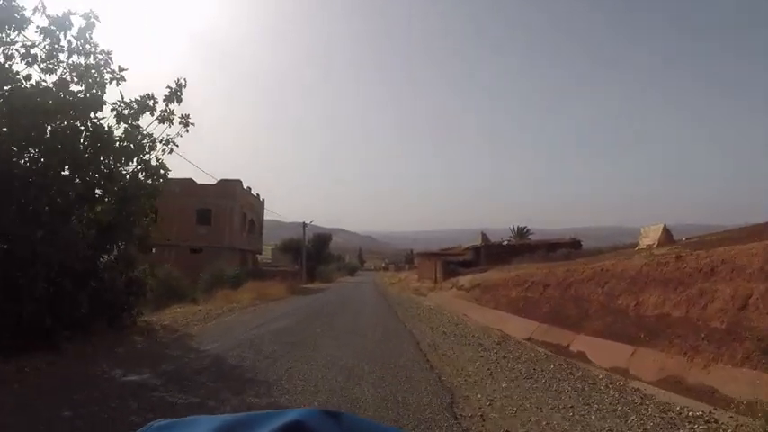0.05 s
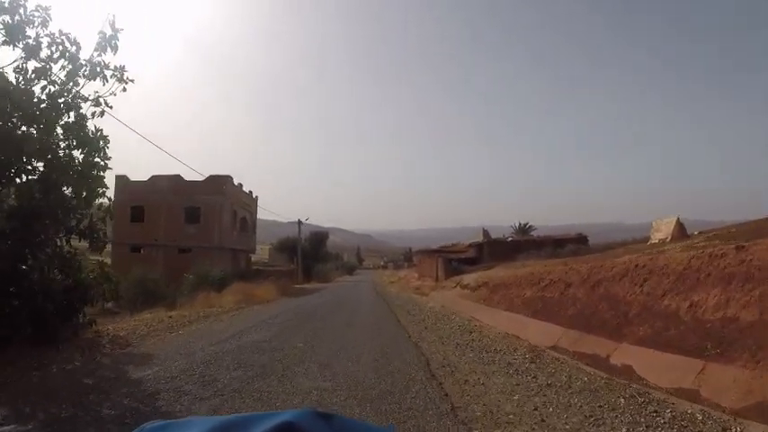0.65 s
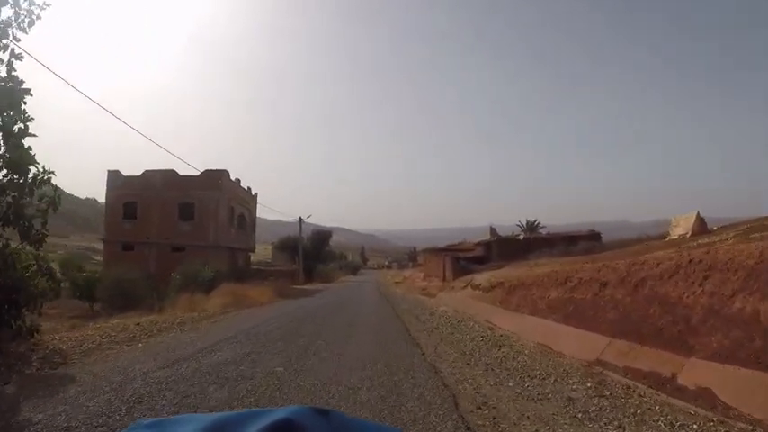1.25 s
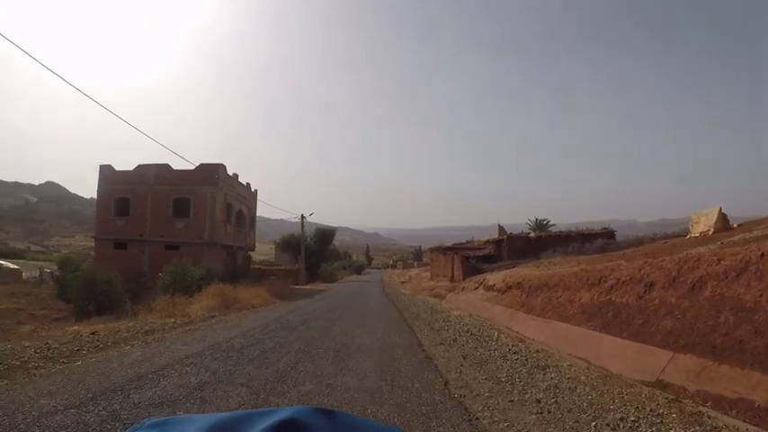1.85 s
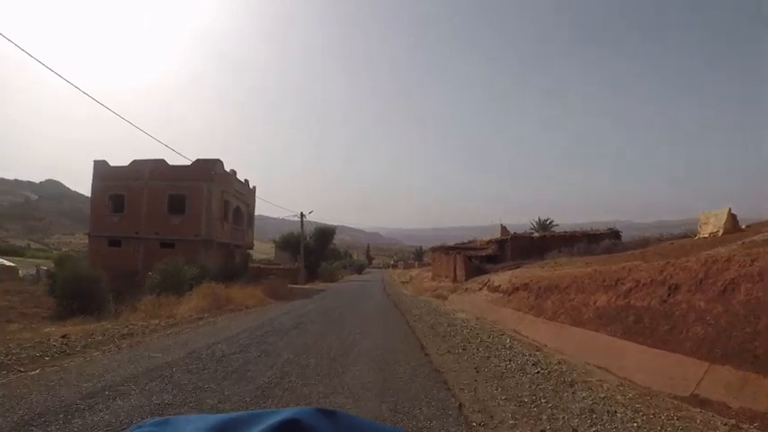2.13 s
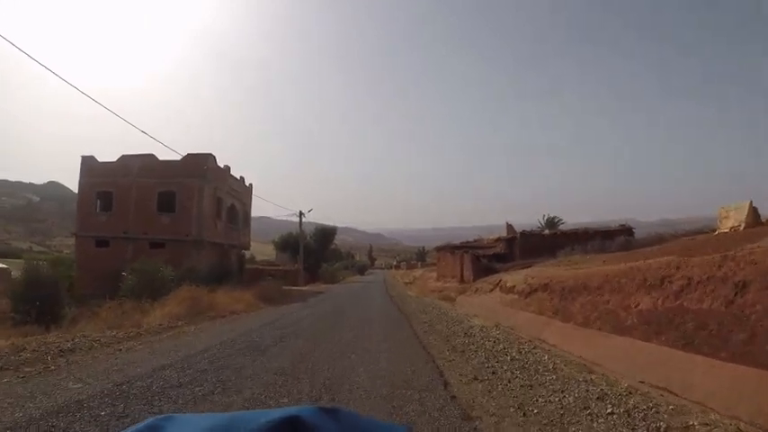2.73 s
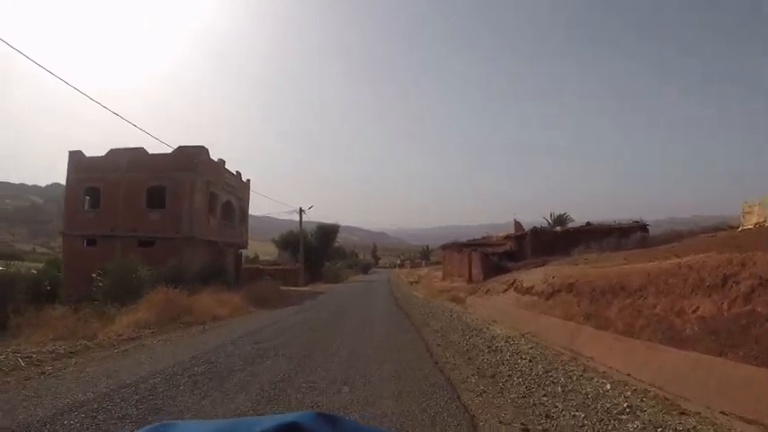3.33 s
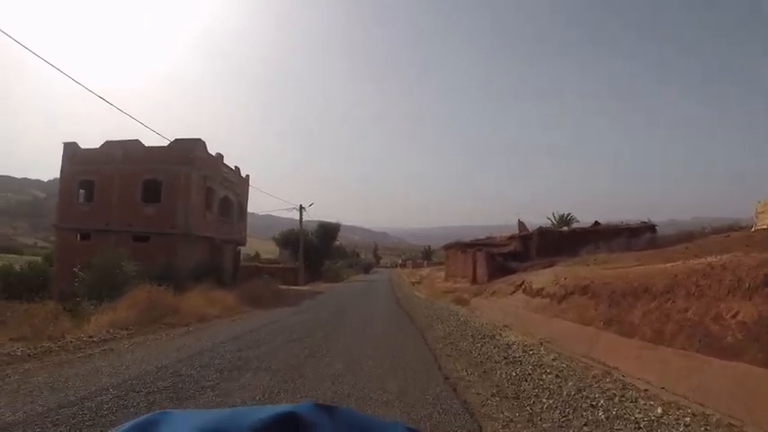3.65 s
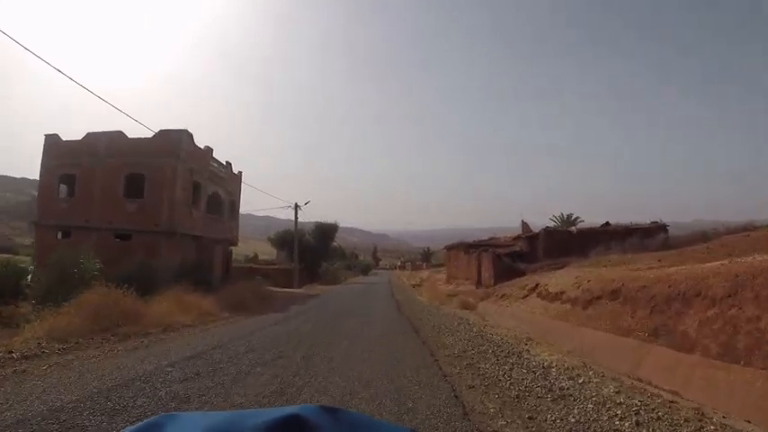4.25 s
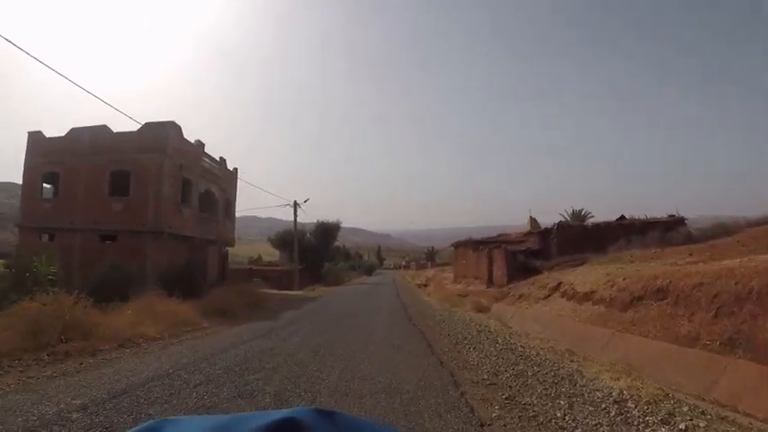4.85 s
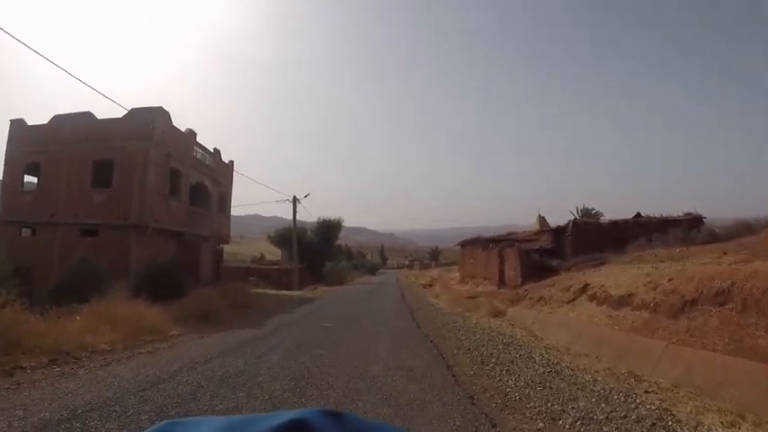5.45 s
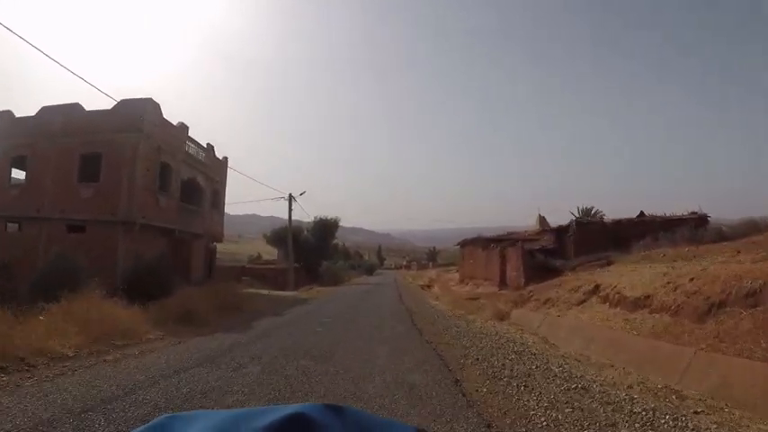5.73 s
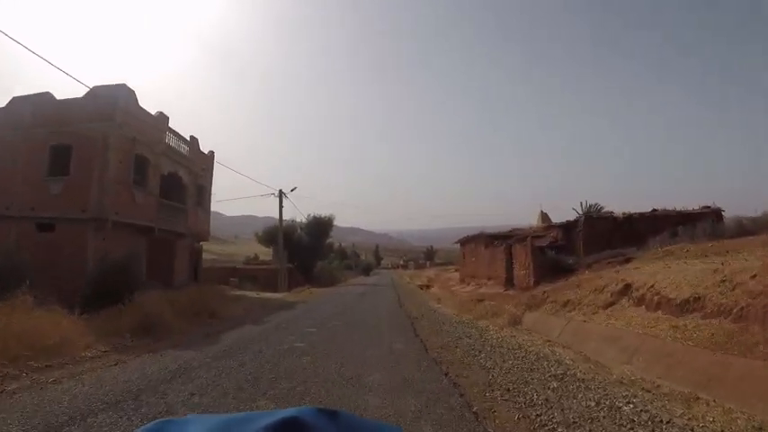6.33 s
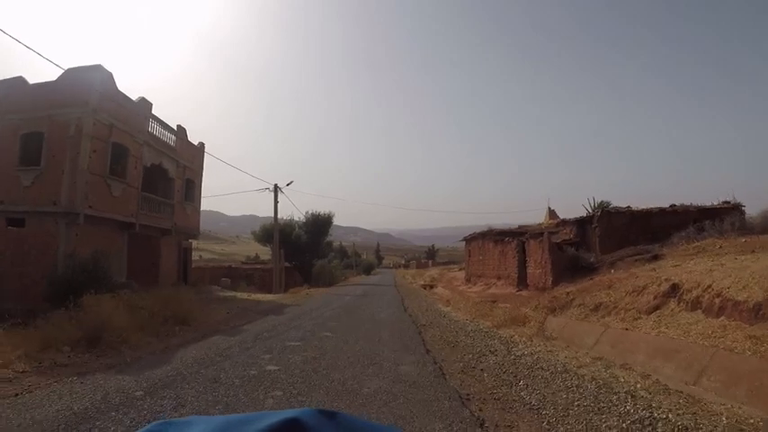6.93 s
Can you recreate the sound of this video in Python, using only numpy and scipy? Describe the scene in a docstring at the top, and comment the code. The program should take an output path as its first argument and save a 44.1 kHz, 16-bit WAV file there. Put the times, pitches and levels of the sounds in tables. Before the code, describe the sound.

Low, gusty wind flutters against a microphone mounted on a loaded cart travelling outdoors. Under it the wheels rumble steadily over coarse asphalt, and bumps keep setting off hollow knocks, dull thumps and short scuffs from the load. Small clicks and light rattles are scattered all the way through, with a couple of sharper ticks a little past the middle.

```python
"""Knocks and thumps over a low, uneven drone: a loaded cart rolls along rough asphalt.
Each bump is an impact that rings the modes of a camera mount on the frame and makes the load scuff
by sliding friction; loose parts tick, rattle and chink, and the load creaks once by stick-slip.
Something brushes about once a turn. Turbulent wind buffets the microphone, over a fine hiss
and a thin shrill band that fades away."""
import sys
import numpy as np
from scipy import signal
from scipy.fft import rfft, irfft, next_fast_len
from scipy.io import wavfile
from scipy.ndimage import uniform_filter1d

SR = 44100
rng = np.random.default_rng(int(sys.argv[2]) if len(sys.argv) > 2 else 0)


def waveform_to_disk(signal):
    """Save audio, clipped to [-1, 1], as 16-bit WAV at the path in sys.argv[1]."""
    frames = np.transpose(np.atleast_2d(signal))
    scaled = np.clip(frames, -1, 1) * 32767
    samples = np.round(scaled).astype(np.int16)
    wavfile.write(sys.argv[1], SR, samples)


N = 312228
T = np.arange(N) / SR

# bumps in the road: (time [s], level [dB], scuff offset [dB], thump offset [dB], rise time [s],
# pitch of the knock [Hz])
BUMPS = [(0.005, -19, -16.5, -22, 0.0037, 412), (0.072, -22.5, -27, -20, 0.0084, 390),
         (0.157, -18, -19, 1, 0.0087, 440), (0.245, -19.0, -23, -1, 0.0039, 396),
         (0.417, -14, -22, 0, 0.0065, 410), (0.453, -16, -30, -26, 0.0019, 440),
         (0.502, -21, -19.5, -0.5, 0.004, 388), (0.572, -16, -24, -3, 0.021, 365),
         (0.675, -15.5, -20, -5, 0.011, 445), (0.763, -16, -25, -3.5, 0.0035, 456),
         (0.841, -17.5, -22, -19, 0.0029, 440), (1.035, -17.5, -21.5, 3, 0.0032, 380),
         (1.128, -19, -25, -12, 0.0042, 404), (1.156, -16.5, -16, -11, 0.01, 397),
         (1.229, -23, -27, -11, 0.0025, 423), (1.269, -23.5, -22, -11, 0.0022, 450),
         (1.284, -23, -14, -9, 0.004, 402), (1.301, -16.5, -23, -12, .002, 467),
         (1.358, -19.5, -32, -3, 0.011, 335), (1.426, -19, -22, -2, 0.0025, 418),
         (1.695, -13.5, -21.5, -1.5, 0.0044, 460), (1.964, -18.5, -22.5, 4, 0.0071, 460),
         (2.025, -24, -29, -19, 0.0042, 420), (2.052, -13, -33, -20, 0.0057, 433),
         (2.082, -16, -32.5, -17, 0.0092, 440), (2.129, -20.5, -16, -2, 0.0058, 473),
         (2.18, -19, -29, -4, 0.003, 463), (2.218, -22, -20.5, -17, 0.0015, 425),
         (2.365, -17, -18.5, 2.5, 0.0069, 480), (2.624, -20.5, -16, -2, 0.0043, 385),
         (2.705, -24, -24, -18, 0.0022, 420), (2.782, -25, -18, 6, 0.0046, 400),
         (2.885, -26.5, -19, -20, 0.0032, 397), (2.972, -22, -26, -12, .003, 414),
         (3.045, -16.5, -20.5, -16, 0.0055, 380), (3.076, -20.5, -26, -18, 0.021, 410),
         (3.288, -16, -25, -2, 0.0018, 430), (3.342, -21, -34, -3, 0.004, 420),
         (3.391, -18.5, -37, 0, 0.0016, 425), (3.439, -14, -28, -12, 0.0086, 456),
         (3.529, -13, -26, -7, 0.0064, 443), (3.661, -17.5, -19, -14, 0.0052, 390),
         (3.695, -19.5, -22.5, -15, 0.0018, 420), (3.72, -16.5, -19, 2, 0.013, 450),
         (3.798, -19, -18, -14.5, 0.0016, 412), (3.823, -19.5, -18, -12, 0.0035, 420),
         (3.866, -19, -16.5, 1, 0.0021, 370), (3.963, -13, -27, -26.5, 0.0077, 464),
         (4.236, -18, -18, -9, 0.012, 405), (4.398, -10, -30, -25, 0.0053, 420),
         (4.432, -18.5, -37, -13, 0.0096, 412), (4.572, -21.0, -19, -20, 0.0016, 383),
         (4.834, -16, -21.5, -8, 0.0052, 404), (4.872, -19, -13, 2.5, 0.0012, 417),
         (5.08, -17.5, -27, -17, 0.011, 444), (5.119, -17, -20.5, -24, 0.0082, 433),
         (5.139, -17, -38, -19, 0.0025, 433), (5.319, -11.5, -32, -25, 0.0017, 452),
         (5.393, -15.5, -22, -5, 0.0094, 470), (5.445, -16, -31, -20, 0.0017, 370),
         (5.518, -21.5, -22, 0, 0.018, 475), (5.567, -21, -26, -4, 0.0074, 416),
         (5.608, -21, -27, -19, 0.012, 408), (5.716, -13, -37, -7, 0.0071, 410),
         (5.756, -25, -31, 5, 0.018, 460), (5.812, -24, -14.5, -3, 0.0076, 400),
         (5.829, -14.5, -17.5, 0, 0.0014, 397), (5.846, -18, -41, -11, 0.007, 420),
         (5.881, -20, -19, -13, .003, 416), (5.915, -14, -17.5, 0, 0.0041, 390),
         (5.938, -26.5, -17.5, -5, 0.0078, 415), (6.014, -23, -22, -16, 0.0032, 414),
         (6.096, -21, -28, -9, .003, 414), (6.18, -21.5, -26, -13, 0.0043, 427),
         (6.298, -16.5, -17, -26, 0.0015, 427), (6.416, -14.5, -22, 2, 0.0064, 486),
         (6.623, -27.5, -20, 8, 0.0043, 416), (6.716, -16, -20.5, -7, 0.0024, 423),
         (6.764, -10, -28.5, -15, 0.01, 450), (6.834, -21.5, -20.5, -11, 0.0047, 425),
         (6.895, -28, -17, -7, .003, 420), (6.985, -18.5, -19, 1, 0.0077, 480),
         (7.022, -16, -23.5, -11, 0.0041, 424)]
# spectrum of scuffing contact: (frequency [Hz], level [dB])
SCUFF_SPECTRUM = [(250, -17), (600, 3), (700, 4), (800, 9.5), (950, 2), (1130, 1.5), (1380, -5),
                  (1600, -0.5), (1900, -5.5), (2300, -10.5), (3250, -14.5), (3900, -39.5), (6000, -33),
                  (15000, -57)]


def jolts(knock_db=-0.12, scuff_db=-2.5, thump_db=-4, sharpness=1.18, settle_s=0.00089):
    """Impact excitation: a bump's flurry of blows rings the mount, thumps the frame, slides the load."""
    # response of the frame: (frequency [Hz], level [dB])
    thump_spectrum = [(40, -35), (110, 4), (170, 9), (240, 4), (300, -6.5), (500, -59), (3000, -110)]
    out, t = np.zeros(N), np.arange(7000) / SR
    slips = np.tile(amp(4 * wobble(rate_hz=300)), 2)  # the grain of sliding friction
    for at, db, scuff_offset_db, thump_offset_db, rise_s, hz in BUMPS:
        age = (t / max(rise_s, 0.002)) ** sharpness
        force = noise(len(t)) * np.sqrt(age) * np.exp(-age / 2)
        ring = mount(force, damping=1.26, pitch_hz=hz, focus_hz=80)
        knock = amp(knock_db) * crest(ring, size=400)
        thump = amp(thump_db + thump_offset_db) * crest(colour(force, thump_spectrum), size=500)
        rub = noise(len(t)) * t * np.exp(-t / (rise_s + settle_s))  # the load lags and slides on
        rub *= slips[round(at * SR):][:len(t)]
        scuff = amp(scuff_db + scuff_offset_db) * crest(colour(rub, SCUFF_SPECTRUM), size=500)
        add(out, at, amp(db) * (knock + thump + scuff))
    return out


def mount(force, damping=1, pitch_hz=430, focus_hz=np.inf):
    """Modal resonance: the mount rings in a few broad modes; a blow may favour those near one pitch."""
    # modes of the mount: (frequency [Hz], width at damping 1 [Hz], level [dB])
    modes = [(352.8, 38.4, 4.5), (436.4, 116, 4), (483.5, 33, 1.5), (640, 150, -41.5)]
    f = np.geomspace(100, 16000, num=300)
    power = sum(amp(db) ** 2 / (1 + (2 * (f - hz) / (width * damping)) ** 2) ** 2
                for hz, width, db in modes)
    power /= 1 + ((f - pitch_hz) / focus_hz) ** 2
    return colour(force, np.c_[f, 10 * np.log10(power)])


def landings(level_db=-3.5, swell_cycles=0.8, click_db=-31, click_s=0.0006):
    """Damped oscillation: the landing load shoves the frame through a swing or two, with a dry click."""
    # solid blows of the load on the bed: (time [s], level [dB], pitch [Hz])
    blows = [(0.433, -4.5, 397), (0.705, -16, 333), (0.712, -7, 168), (0.973, -6, 150), (1.095, -15, 206),
             (1.359, -9, 303), (1.396, -9, 357), (1.779, -13, 194), (2.060, -16, 430), (2.314, -5.5, 131),
             (2.378, -11.5, 403), (2.504, -14, 128), (2.865, -7, 133), (2.888, -10.5, 375),
             (3.323, -5, 390), (3.395, -15, 395), (3.449, -12, 450), (3.539, -12, 433), (3.802, -8, 407),
             (4.147, -17, 190), (4.154, -8.5, 119), (4.456, -11.5, 388), (4.878, -10.5, 400),
             (4.925, -12, 240), (5.727, -11, 390), (5.833, -3.5, 380), (5.923, -8.5, 410),
             (6.423, -7.5, 406), (6.721, -10, 410), (6.785, -8, 404)]
    # spectrum of the click: (frequency [Hz], level [dB])
    click_spectrum = [(300, -17.5), (900, 1), (1600, 3.5), (2300, -3.5), (2700, -7), (3100, -1.5),
                      (3500, -12.5), (4200, -23), (9000, -39)]
    out, t = np.zeros(N), np.arange(3000) / SR
    for at, db, hz in blows:
        swing = pulse(t * hz / swell_cycles) ** 2 * np.sin(2 * np.pi * hz * t)
        add(out, at, amp(db + level_db) * swing)
        contact = noise(len(t)) * t * np.exp(-t / click_s)
        add(out, at, amp(db + click_db) * crest(colour(contact, click_spectrum), size=130))
    return out


def rolling(drone_db=-32, grit_db=-51, shake_db=4.5, grit_shake_db=1.5, stones_per_s=350):
    """Roughness excitation: stones under the wheels drive an uneven drone in the mount, and grit."""
    # roughness of the asphalt: (time [s], level [dB])
    roughness = [(0.0, 12), (0.33, 2.5), (0.6, 3), (0.92, 6), (1.3, 6), (1.6, 8), (2.15, 7.5), (2.68, 3.5),
                 (3.3, 6), (3.8, 0.5), (4.1, 4), (4.7, 1.5), (5.15, 10), (5.8, 8.5), (6.05, 0), (6.52, 2),
                 (6.7, 7), (7.08, 5.5)]
    drive = follow(roughness) ** 0.68  # the sound grows more slowly than the roughness
    shake = np.minimum(wobble(rate_hz=37), 1.5)
    stones = (rng.random(N) < stones_per_s / SR) * rng.choice([-1, 1], N)
    stones = stones * amp(2 * np.minimum(rng.exponential(1, N), 4))  # a few strike harder
    force = unit(stones) + 0.61 * noise(N)  # single stones over the fine grain of the road
    drone = unit(mount(force * amp(shake_db * shake)))
    grit = unit(colour(force * amp(grit_shake_db * shake), SCUFF_SPECTRUM))
    return drive * (amp(drone_db) * drone + amp(grit_db) * grit)


def ticks(snap_db=12, hard_db=-28, rebound_db=-12, chatter_db=-22, chatter_s=0.009):
    """Impact and rebound: a loose part strikes the frame, rings, drops back once and chatters."""
    # strikes of loose parts: (time [s], level [dB], pitch [Hz], contact time [s])
    strikes = [(.073, -30.5, 1610, 0.00085), (.1486, -41, 1560, .0011), (.4148, -31, 1570, 0.003),
               (.4295, -37.5, 1890, 0.0013), (0.4357, -30, 3300, 0.00025), (0.565, -38, 1300, .0014),
               (0.602, -36, 1310, 0.0016), (.7645, -32, 1710, 0.001), (0.837, -34.5, 1800, 0.0018),
               (.965, -37.5, 1480, 0.0016), (1.2007, -36, 1190, 0.00091), (1.305, -31, 1600, 0.0016),
               (1.4, -32, 1120, 0.00086), (1.459, -32, 1390, 0.0016), (1.5442, -30, 2340, 0.002),
               (1.639, -32, 1390, 0.0009), (1.75, -36, 1100, 0.00072), (1.802, -30, 1120, 0.0021),
               (1.8977, -35.5, 1700, 0.00091), (2.149, -34.5, 1700, 0.0013), (2.227, -34, 2330, 0.0017),
               (2.444, -35, 1830, 0.002), (2.4777, -34, 1100, .0014), (2.8193, -31, 1490, 0.0011),
               (2.898, -34, 2290, 0.0022), (3.152, -29, 1210, 0.0015), (3.496, -33, 1410, 0.0011),
               (3.673, -33, 1340, 0.0013), (3.8491, -31, 1790, 0.0015), (4.189, -30.5, 1740, 0.0011),
               (4.2671, -19, 1980, 0.00059), (4.5282, -29, 1610, 0.00093), (4.76, -34.5, 1260, 0.001),
               (4.9428, -22.5, 2410, 0.00119), (5.0424, -31, 1200, .0012), (5.123, -40, 1300, .001),
               (5.208, -29.5, 1190, 0.0022), (5.229, -34, 1100, 0.0014), (5.557, -26.5, 1390, 0.00055),
               (5.5782, -42, 1250, .0012), (5.616, -38, 1550, 0.00062), (5.633, -29.5, 2110, 0.00059),
               (5.699, -32, 1250, 0.001), (5.777, -35, 1300, 0.0011), (5.824, -28, 1510, 0.0021),
               (5.896, -31.5, 1050, 0.0057), (5.919, -39, 1680, 0.0012), (6.017, -40, 1700, 0.0027),
               (6.25, -33, 1510, 0.0014), (6.2702, -38, 1460, 0.0013), (6.301, -48, 1310, 0.0016),
               (6.317, -32, 2020, 0.00085), (6.5575, -34, 1100, .0012), (6.592, -27, 1430, 0.0027),
               (6.8287, -28, 2550, 0.00086), (6.9332, -29, 1320, .0013), (7.012, -34, 1120, 0.00075)]
    # ring of a loose part: (frequency [multiples of its pitch], level [dB])
    part_spectrum = [(.1, -25.5), (.36, -1.5), (.5, 1.5), (.68, -0.5), (1.001, 2), (1.2, -4), (1.421, -9.5),
                     (1.8, -21), (2.3, -26), (3, -35.5), (7, -54.5)]
    # the camera case, which every tick passes through: (frequency [Hz], gain [dB])
    case_response = [(400, -4), (650, 5), (870, 2), (1100, 0.5), (1550, -0.5), (1850, 0), (2250, 2),
                     (2700, 1.5), (3050, 3), (3500, 4.5), (4000, 1), (4700, -3.5), (5600, 1), (6600, -7.5),
                     (9000, -18), (15000, -24.5)]
    out, t = np.zeros(N), np.arange(2000) / SR
    chatter = amp(chatter_db) * np.exp(-t / chatter_s)
    for at, db, hz, contact_s in strikes:
        age = t / max(contact_s, 0.0004)  # in contact times
        rebound = amp(rebound_db) * pulse(np.maximum(age - 6, 0))
        contact = noise(len(t)) * (pulse(age) + rebound + chatter)
        contact[np.argmax(age >= 1)] += amp(snap_db) * min(1, amp(db - hard_db))  # strong blows snap
        ring = colour(contact, np.array(part_spectrum) * [hz, 1])
        add(out, at, amp(db) * crest(colour(ring, case_response), size=130))
    return out


def creak(level_db=7, slips_per_s=135, jitter_periods=0.13, ring_s=0.0018):
    """Stick-slip friction: something in the load slips a few times, each slip ringing higher."""
    # course of the creak: (time [s], level [dB], pitch [Hz])
    course = [(1.351, -48, 570), (1.36, -29, 610), (1.37, -28.5, 646), (1.385, -38, 810),
              (1.401, -39, 1010), (1.41, -58, 1080)]
    times, db, hz = np.transpose(course)
    out, t = np.zeros(N), np.arange(1000) / SR
    for at in np.arange(times[0], times[-1], 1 / slips_per_s):
        at += jitter_periods * rng.standard_normal() / slips_per_s
        ring = pulse(t / ring_s) * np.sin(2 * np.pi * np.interp(at, times, hz) * t)
        add(out, at, amp(np.interp(at, times, db) + level_db) * ring)
    return out


def rattle(level_db=-52, taps_per_s=36, parts=12, ring_q=5, settle_s=0.02, idle=0.3, contact_s=0.0014):
    """Random impacts: small parts of the load tap, each at its own pitch, most often just after a bump."""
    out, t, kicks = np.zeros(N), np.arange(1000) / SR, np.zeros(N)
    for at, db, scuff_offset_db, *_ in BUMPS:
        add(kicks, at, amp([db + scuff_offset_db]))
    unrest = signal.lfilter([1], [1, -np.exp(-1 / (settle_s * SR))], kicks)
    unrest = idle + (1 - idle) * unrest / unrest.mean()
    for hz in np.geomspace(1150, 3150, parts):
        hits = rng.random(N) < unrest * taps_per_s / parts / SR
        strength = amp(2 * np.minimum(rng.exponential(1, N), 2))
        contact = noise(len(t)) * t * np.exp(-t / contact_s)
        tap = unit(resonate(contact, hz, ring_q)) * hz  # higher parts are weighted more
        out += signal.oaconvolve(hits * strength, tap)[:N]
    return amp(level_db) * unit(colour(out, SCUFF_SPECTRUM))


def chinks(level_db=-2.5, ring_q=11, grit_db=-11):
    """Free vibration: small metal parts graze with a little grit and ring briefly on one thin note."""
    # touches of metal on metal: (time [s], level [dB], pitch [Hz], contact time [s])
    touches = [(0.433, -48, 5000, .0012), (.838, -49, 4770, .003), (.968, -52, 5070, .003),
               (1.005, -58, 6200, .006), (1.243, -45, 6060, 0.0028), (1.471, -54, 4900, .002),
               (1.745, -51, 5180, 0.0032), (1.998, -50.5, 4670, 0.0029), (2.564, -44, 4470, .001),
               (2.759, -52, 4900, 0.0027), (4.9422, -43, 5530, 0.0014)]
    # spectrum of the grit: (frequency [Hz], level [dB])
    grit_spectrum = [(1000, -17), (3500, -4), (6200, -1), (7500, -11), (11000, -16), (13800, -9),
                     (15000, -23)]
    out, t = np.zeros(N), np.arange(3000) / SR
    for at, db, hz, contact_s in touches:
        graze = noise(len(t)) * t / contact_s * np.exp(-t / contact_s)
        ring = crest(resonate(graze, hz, ring_q, stages=2), size=130)
        grit = crest(colour(graze, grit_spectrum), size=130)
        add(out, at, amp(db + level_db) * (ring + amp(grit_db) * grit))
    return out


def brushing(level_db=2.5, resting_db=-61):
    """Friction noise: a soft rub swells with contact pressure as a turning part comes round."""
    # rubs about once a turn: (time of the peak [s], level [dB], half length [s])
    rubs = [(0.205, -54, 0.064), (.895, -53.5, .05), (1.585, -55, .048), (2.275, -53.5, 0.044),
            (2.952, -48.5, 0.041), (3.66, -56, .035), (5.67, -54, 0.036), (6.385, -53, 0.056),
            (7.075, -49.5, 0.051)]
    # lighter grazes in between: (time of the peak [s], level [dB], half length [s])
    grazes = [(1.14, -60, 0.07), (1.897, -58.5, 0.067), (3.227, -65, 0.15), (3.514, -56, 0.033),
              (3.82, -63, .035), (3.923, -61, 0.056), (4.32, -61, 0.06), (4.57, -65, 0.081),
              (5.95, -65, 0.059)]
    # spectrum of the rub: (frequency [Hz], level [dB])
    rub_spectrum = [(500, -26), (1500, 1.5), (3400, -1), (4000, -5.5), (6100, -9.5), (7000, -16),
                    (9000, -18), (11000, -30), (13500, -22), (15000, -36)]
    pressure = sum(amp(db) * np.exp(-((T - at) / half_s) ** 2) for at, db, half_s in rubs + grazes)
    resting_pressure = amp(resting_db + 3 * wobble(rate_hz=5))
    friction = noise(N) * amp(0.7 * wobble(rate_hz=70))  # the rub catches slightly
    return (amp(level_db) * pressure + resting_pressure) * unit(colour(friction, rub_spectrum))


def wind(push_db=1.5, buffet_db=-6.5, steadiness=0.46, buffet_growth=0.91):
    """Turbulent pressure: large eddies push on the microphone and small ones buffet it, in quick gusts."""
    # strength of the wind: (time [s], level [dB])
    strength = [(0.0, -19.5), (0.35, -24.5), (0.47, -15), (0.7, -17.5), (0.87, -17.5), (1.4, -14),
                (1.55, -22), (1.85, -20), (2.0, -17.5), (2.33, -16), (2.55, -19), (2.9, -19), (3.1, -18),
                (3.6, -21.5), (4.0, -17.5), (4.42, -19), (5.35, -22), (5.93, -20.5), (6.0, -27.5),
                (6.08, -21), (6.7, -20), (7.08, -19.5)]
    # spectrum of the large eddies: (frequency [Hz], level [dB])
    push_spectrum = [(5, -43), (15, 2), (28, 0), (42, 1.5), (62, -7.5), (85, -14.5), (130, -28.5),
                     (300, -99), (2000, -120)]
    # spectrum of the small eddies: (frequency [Hz], level [dB])
    buffet_spectrum = [(40, -28), (80, 4.5), (125, -1), (175, -1), (240, -8), (290, -14), (450, -17.5),
                       (800, -39.5), (2000, -62), (8000, -110)]
    swell = follow(strength)
    push = swell * amp(0.5 * wobble(rate_hz=6))
    buffet = swell.mean() * (swell / swell.mean()) ** buffet_growth * amp(2 * wobble(rate_hz=9))
    eddies = unit(colour(noise(N), push_spectrum))
    local_rms = np.sqrt(abs(uniform_filter1d(eddies ** 2, size=4000)) + 1e-6)
    eddies = unit(eddies / local_rms ** steadiness)  # eddies in one gust are of like size
    flutter = unit(colour(noise(N) * amp(1.84 * wobble(rate_hz=29)), buffet_spectrum))
    return amp(push_db) * push * eddies + amp(buffet_db) * buffet * flutter


def air(hiss_db=-55.5, shrill_hz=6050, shrill_q=5.2, flicker_db=2):
    """Broadband and narrowband noise: a steady hiss, and a shrill band that fades as the cart moves on."""
    # fading of the shrill band: (time [s], level [dB])
    shrill_level = [(0, -64), (1.3, -65), (3, -87.5), (7.08, -84)]
    # spectrum of the hiss: (frequency [Hz], level [dB])
    hiss_spectrum = [(500, 14.5), (3300, 8), (4200, 1), (6200, -1.5), (7100, -6), (8900, 3.5), (11000, -4),
                     (13500, -8.5), (15000, -28.5)]
    band = resonate(noise(N), shrill_hz, shrill_q, stages=2)
    shrill = unit(band * amp(flicker_db * wobble(rate_hz=12)))
    hiss = unit(colour(noise(N), hiss_spectrum))
    return amp(hiss_db) * hiss + follow(shrill_level) * shrill


def amp(db):
    """Decibels to amplitude gain."""
    return 10 ** (np.asarray(db) / 20)


def unit(x):
    """Normalisation to rms 1."""
    return x / np.sqrt(np.mean(x ** 2) + 1e-20)


def crest(x, size):
    """Normalisation of the loudest stretch of size samples to rms 1."""
    return x / np.sqrt(uniform_filter1d(x ** 2, size).max() + 1e-20)


def follow(curve):
    """Interpolation of (time [s], level [dB]) rows to a gain at every sample."""
    return amp(np.interp(T, *np.transpose(curve)))


def add(mix, at, sound):
    """Superposition: mixes a sound in at a time in seconds."""
    part = mix[max(0, round(at * SR)):][:len(sound)]
    part += sound[:len(part)]


def pulse(age):
    """Critically damped response: rises to 1 at age 1, then dies away."""
    return age * np.exp(1 - age)


def noise(size):
    """White Gaussian noise."""
    return rng.standard_normal(size)


def wobble(rate_hz):
    """Random modulation: noise of rms 1, low-passed at the given rate."""
    f = np.fft.rfftfreq(N, 1 / SR)
    return unit(irfft(rfft(noise(N)) / (1 + (f / rate_hz) ** 4), N))


def resonate(x, hz, q, stages=1):
    """Resonance: like second-order band-passes in series."""
    for _ in range(stages):
        x = signal.lfilter(*signal.iirpeak(hz, q, SR), x)
    return x


def colour(x, spectrum):
    """Minimum-phase filtering by (frequency [Hz], level [dB]) rows."""
    size = 2 * next_fast_len(len(x) // 2 + 2048)
    hz, db = np.transpose(spectrum)
    f = abs(np.fft.fftfreq(size, 1 / SR))
    log_gain = np.log(amp(np.interp(np.log(f + 1), np.log(hz + 1), db)))
    response = np.exp(np.conj(signal.hilbert(log_gain)))[:size // 2 + 1]
    return irfft(rfft(x, size) * response, size)[:len(x)]


def scene():
    """Free-field superposition: the sources add close to the microphone, in the open air."""
    cart = rolling() + jolts() + landings() + ticks() + rattle() + creak() + chinks() + brushing()
    return (cart + wind() + air())[None]


def record(dry):
    """Band limiting: a low-pass at 15 kHz, with 6 ms fades that keep the ends free of clicks."""
    lowpass = signal.firwin(1023, 15000, window=("kaiser", 9), fs=SR)
    fade = np.minimum(np.minimum(T, T[::-1]) / 0.006, 1)
    return signal.oaconvolve(dry * fade, lowpass[None], "same")


dry = scene()
out = record(dry)
waveform_to_disk(out)
```